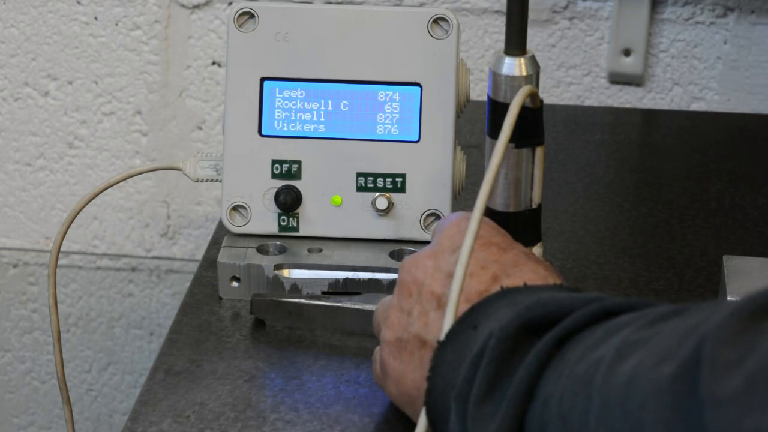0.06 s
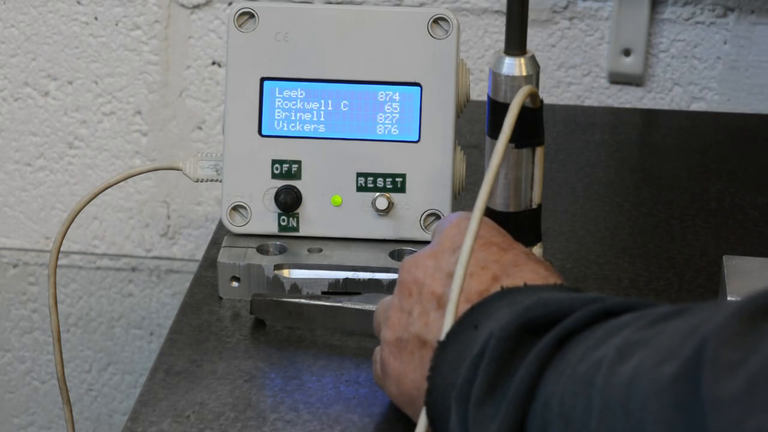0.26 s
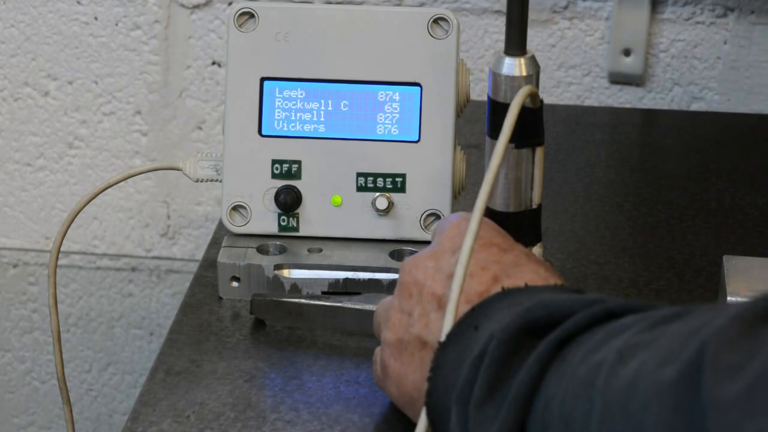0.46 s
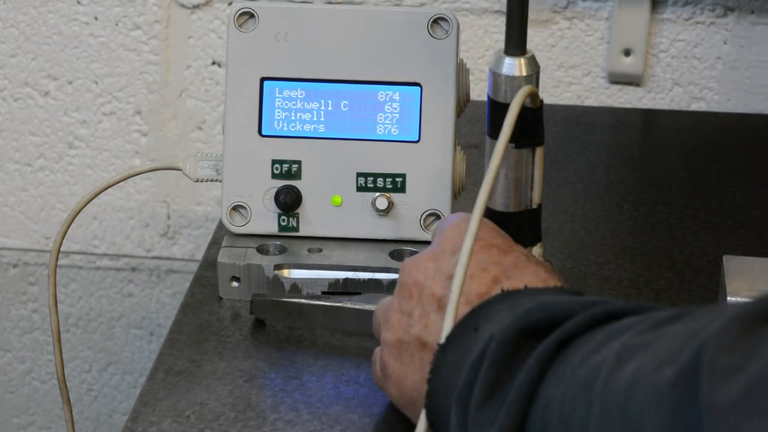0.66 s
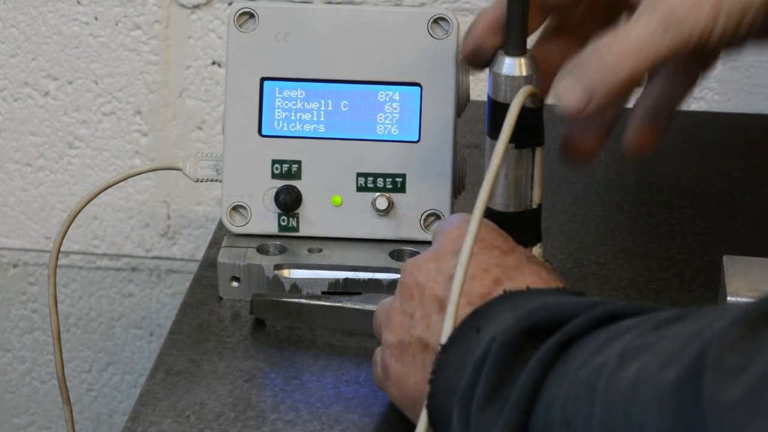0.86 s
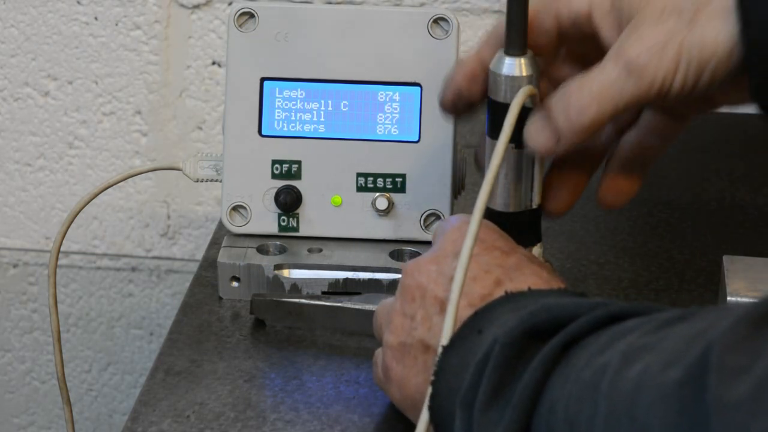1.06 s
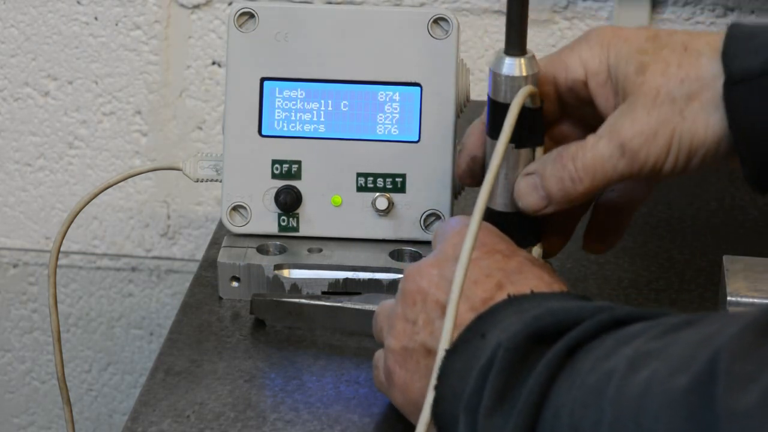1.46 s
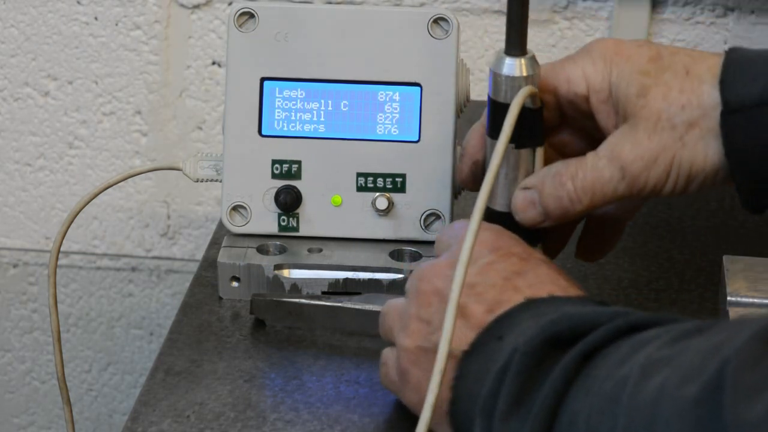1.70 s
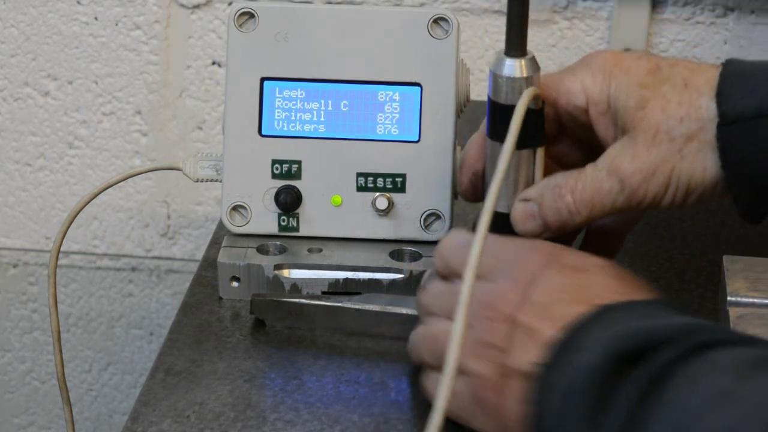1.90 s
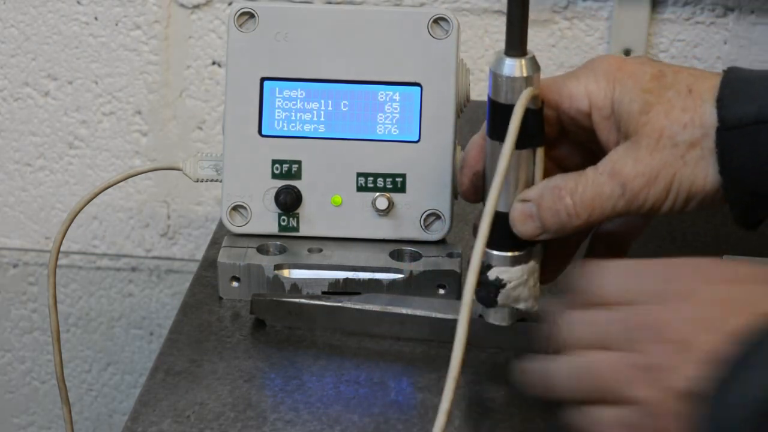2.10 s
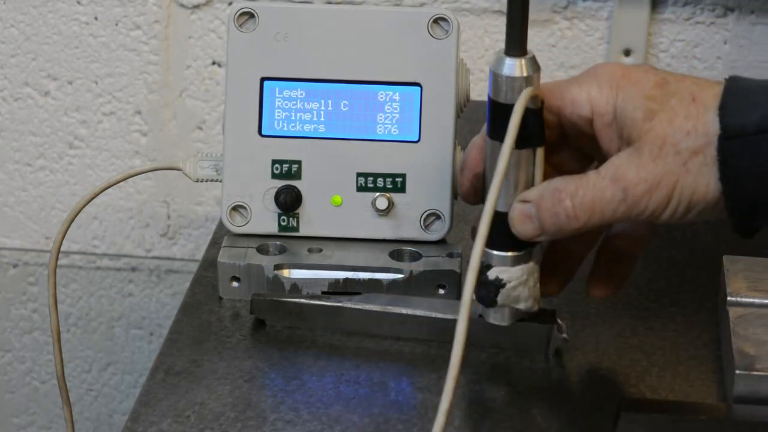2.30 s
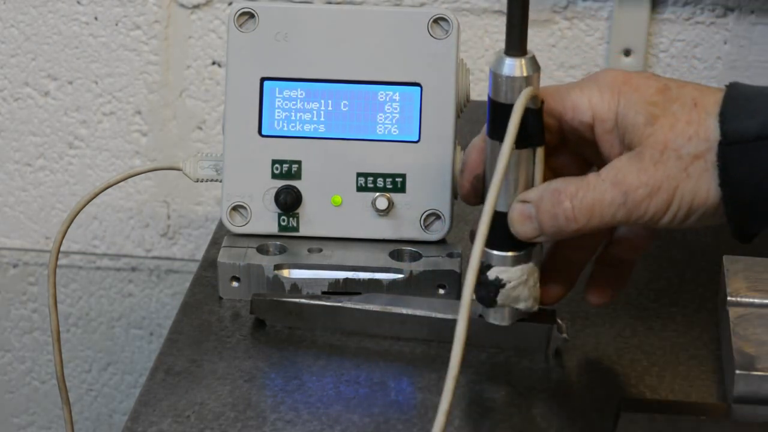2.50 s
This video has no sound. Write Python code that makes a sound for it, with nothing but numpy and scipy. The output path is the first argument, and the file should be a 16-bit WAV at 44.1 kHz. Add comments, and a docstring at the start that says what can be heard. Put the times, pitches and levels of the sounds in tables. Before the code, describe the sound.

Bright metallic clicks ring out close by as a small object bounces down to rest on steel, quickening and fading into a short rattle. Faint ticks, one soft sleeve brush and a low workshop hum lie underneath.

```python
"""Sharp ringing cracks quicken into a brief chatter: a small hard body drops down a guide tube
and bounces to rest on a steel block. Each contact sets tube, block and fittings ringing and dies
away in the workshop. Faint ticks and one sleeve brush fall around the bounces, over mains hum,
a thin steady whistle, hiss and the low rumble of hands on the bench."""
import sys
import numpy as np
from scipy import signal
from scipy.fft import rfft, irfft
from scipy.io import wavfile

SR = 44100
rng = np.random.default_rng(int(sys.argv[2]) if len(sys.argv) > 2 else 0)


def inscribe(sig):
    """Save sig as 16-bit PCM at rate SR to the path in sys.argv[1].

    A 1-D sig is mono; a 2-D sig holds one channel per row.
    Samples are clipped to [-1, 1] before scaling.
    """
    pcm = np.round(np.clip(np.atleast_2d(sig).T, -1, 1) * 32767)
    wavfile.write(sys.argv[1], SR, pcm.astype(np.int16))


N = 116865
RING = 16384   # samples per struck sound
AGE_S, TIME_S = np.arange(RING) / SR, np.arange(N) / SR
# dense ringing of the fittings: (frequency [Hz], density [dB])
FITTINGS_SPECTRUM = [(100, -54), (300, -19), (550, -15.5), (1000, -9), (1500, -6), (2000, -15.5),
                     (3000, -8.5), (3600, 3), (5000, 1.5), (6800, -3), (8400, -2), (9200, -14.5),
                     (10800, -9.5), (12500, -27), (16000, -48)]
FITTINGS_T60_S = .038


def from_db(db):
    return 10 ** (np.asarray(db) / 20)


def unit_rms(x):
    return x / np.sqrt(np.mean(x ** 2) + 1e-20)


def at_hz(points, hz):
    """Interpolate a table over log frequency."""
    points_hz, values = np.transpose(points)
    return np.interp(np.log(np.maximum(hz, 1)), np.log(points_hz), values)


def bins_hz(size):
    return np.arange(size // 2 + 1) * SR / size


def decay(t60_s):
    return from_db(-60 * AGE_S / t60_s)


def add(out, start_s, sound):
    i = int(np.clip(round(start_s * SR), 0, len(out)))
    out[i:i + len(sound)] += sound[:len(out) - i]


def shaped(white, spectrum):
    """Zero-phase equaliser for noise."""
    return irfft(rfft(white) * from_db(at_hz(spectrum, bins_hz(len(white)))), len(white))


def coloured(x, spectrum):
    """Minimum-phase equaliser: nothing sounds ahead of the attack."""
    cepstrum = irfft(np.log(from_db(at_hz(spectrum, bins_hz(RING)))))
    cepstrum[1:RING // 2] *= 2
    cepstrum[RING // 2 + 1:] = 0
    return irfft(rfft(x) * np.exp(rfft(cepstrum)))


def mode(hz, db, t60_s):
    """One struck partial: a damped sine."""
    return from_db(db) * np.sin(2 * np.pi * hz * AGE_S) * decay(t60_s)


def hiss_and_hum():
    """Steady hiss, mains hum and a thin whistle."""
    # hiss: (frequency [Hz], density [dB])
    spectrum = [(20, 7), (70, 20), (130, 14), (600, 6.5), (2400, 1), (4500, 3.5), (8000, 0), (12000, -4.5),
                (16000, -6.5)]
    # hum and whistle: (frequency [Hz], rms level [dB])
    tones = [(50, -53), (150, -62), (15734, -73)]
    hiss = from_db(-48) * shaped(rng.standard_normal(N), spectrum)
    hum = sum(from_db(db) * np.sin(2 * np.pi * (hz * TIME_S + rng.random())) for hz, db in tones)
    return hiss + np.sqrt(2) * hum


def hand_rumble():
    """Hands moving on the bench: low noise that swells, then holds."""
    # rumble: (frequency [Hz], density [dB])
    spectrum = [(20, 1), (80, -0.5), (160, -5.5), (400, -12.5), (900, -15), (3000, -22.5)]
    # swell: (time [s], rms level [dB])
    levels = [(0, -61), (.9, -53), (1.4, -48), (1.8, -45), (2.15, -45), (2.55, -45), (2.65, -45)]
    swell = from_db(np.interp(TIME_S, *np.transpose(levels)))
    return swell * unit_rms(shaped(rng.standard_normal(N), spectrum))


def ticks(half_width_oct=.04):
    """Light touches: a tiny snap and a narrow band of ringing noise."""
    # touches: (time [s], gain [dB], ring centre [Hz], ring t60 [s], relative snap [dB])
    touches = [(.083, -33.5, 4280, 0.037, -15), (0.371, -38, 3760, 0.17, -1.5), (0.741, -47, 5530, .06, -1),
               (1.136, -43, 6660, .06, 1), (1.177, -39, 5040, 0.089, -1)]
    out = np.zeros(N)
    for start_s, db, hz, t60_s, snap_db in touches:
        white = rng.standard_normal(RING)
        offset_oct = np.log2((bins_hz(RING) + 1) / hz)
        band = irfft(rfft(white) / (1 + (offset_oct / half_width_oct) ** 2))
        ring = .5 * unit_rms(band) * decay(t60_s)
        snap = from_db(snap_db) * unit_rms(shaped(white, FITTINGS_SPECTRUM)) * decay(FITTINGS_T60_S)
        add(out, start_s, from_db(db) * (ring + snap))
    return out


def contacts(chatter_s=2.399, gap_s=.0125, gap_ratio=.75, chatter_db=-22.5, loss_db=2.4):
    """Separate bounces, then six ever shorter, weaker hops in the colour of the last bounce."""
    # bounces: (time [s], strength [dB], crack gain [dB], gain in each of four colour bands [dB])
    bounces = [(0.2103, 0.66, 0.5, 1, -2.5, 3, -2.5), (0.5293, -0.3, 1.5, 2.2, -3, 2, -3.5),
               (0.8035, -0.56, -1.5, 1, -1.5, 0.5, -2), (1.0177, .3, 1, 0.5, -1, -2.2, -2.5),
               (1.1966, -1, 1, 2, -2.5, -1.2, -3), (1.354, -1.7, 0, 2.5, -2, -3.2, -0.3),
               (1.5026, -1.6, 2.5, 0.9, 0.5, -0.5, -4), (1.6434, -3, 3.5, 2, 0.5, -4, 1),
               (1.777, -3.5, 1, 2.3, 3, 0.5, -7.5), (1.8985, -4, 2.5, -0.5, 1.5, 1, -3),
               (2.0021, -5, -0.5, 0.2, 1, -3, 1.2), (2.093, -6, 0, .5, 0, -1.5, 0.5),
               (2.1738, -7.5, 2, 0.5, 2, -5, 0.5), (2.2344, -8.5, 2.5, 0, 0.5, -2.5, 1),
               (2.2841, -12, 2.5, 0, 2, -4, 1), (2.3268, -13.5, 0, -0.5, 4.5, -2.3, 2),
               (2.3582, -17, 2, -1, 3, -2, 1), (2.3821, -18.7, 1.5, -1, 6, -1.5, 4)]
    hops, start_s = [], chatter_s
    for k in range(6):
        hops.append((start_s, chatter_db - loss_db * k, *bounces[-1][2:]))
        start_s += gap_s * gap_ratio ** k
    return [*bounces, *hops]


def crack(hz=6230, bench_s=.001012, wall_s=.0039, scatter_s=.0011, wall_echoes=4):
    """A few cycles of hard contact, an echo off the bench and a cluster off the rough wall."""
    # contact tone: (frequency [Hz], gain [dB])
    tone = [(2700, -10), (3600, 0), (9000, 0), (11000, -4), (12500, -13), (16000, -23)]
    pulse = coloured(np.sin(2 * np.pi * hz * AGE_S) * AGE_S * decay(t60_s=.00075), tone)
    pulse = from_db(-5.5) * pulse / np.abs(pulse).max()
    out = pulse.copy()
    add(out, bench_s, from_db(-2.5) * pulse)
    for k in range(wall_echoes):
        add(out, wall_s + scatter_s * (k + rng.random()) / wall_echoes, from_db(-7.5) * pulse)
    return out


def steel_ring(start_s, strength_db, grip_s=1.45, treble_hz=8250):
    """Tube and block ring; a few modes are muffled once a second hand grips the tube."""
    # tube and block modes: (frequency [Hz], base level [dB], base t60 [s])
    modes = [(845, -46, .33), (917, -36, .18), (952, -38, .13), (1230, -37, .25), (1418, -33, .15),
             (1547, -32, .1), (1590, -34, .09), (2125, -38, .08), (2487, -40, .13), (2575, -38, .27),
             (2780, -39, .16), (2812, -39.5, .24), (3135, -38, .23), (3353, -17, .092), (3430, -34.5, .26),
             (3744, -36, .15), (4391, -31, .16), (4634, -33, .25), (4688, -33, .28), (4732, -28.5, .24),
             (4772, -34, .25), (5002, -35, .27), (5489, -26.5, .26), (5548, -36, .24), (5701, -30.5, .27),
             (5811, -31, .28), (6026, -35, .18), (6400, -35, .18), (6800, -36, .34), (6893, -33, .15),
             (6965, -36, .17), (7175, -37, .19), (8688, -30, .06), (9530, -37, .08), (10620, -39, .06),
             (10850, -37, .07), (11080, -42, .05)]
    # damping by the hand: (mode frequency [Hz], loss [dB])
    grip_loss = [(1230, 5), (1418, 10), (2125, 4), (2575, 5), (6800, 5)]
    loss_db = dict(grip_loss) if start_s > grip_s else {}
    out = np.zeros(RING)
    for k, (hz, db, t60_s) in enumerate(modes):
        spread_db = 3.5 if hz > treble_hz else .93   # top modes depend most on where the body lands
        level_db = db + .37 + spread_db * rng.standard_normal() - loss_db.get(hz, 0)
        out += (-1) ** k * mode(hz, level_db, .99 * t60_s)
    return from_db(strength_db) * out


def fittings_clank(white):
    """Dense, short ringing of the fittings as decaying noise."""
    return from_db(-6.5) * shaped(white, FITTINGS_SPECTRUM) * decay(FITTINGS_T60_S)


def room_tail(white, build_s=.0036):
    """Diffuse workshop sound: builds quickly, dies sooner in the high bands."""
    # room response: (frequency [Hz], density [dB])
    response = [(200, -15.5), (600, -16), (950, -8.5), (1500, -11.5), (1900, -14.5), (2600, -10),
                (2950, -17), (3400, -1.5), (3900, -4.5), (4700, 4), (5200, 2.5), (5700, 4.5), (7000, -1),
                (8400, -4.5), (9200, -12.5), (10800, -12.5), (12500, -22), (16000, -41)]
    # room decay: (frequency [Hz], t60 [s])
    t60s = [(500, 0.3), (2000, 0.28), (5000, 0.21), (8000, 0.19), (12000, 0.16)]
    spectrum, hz = rfft(shaped(white, response)), bins_hz(RING)
    edges_hz = np.r_[0, np.geomspace(1000, 13000, 8), SR]
    tail = np.zeros(RING)
    for lo, hi in zip(edges_hz, edges_hz[1:]):
        band = irfft(spectrum * ((hz >= lo) & (hz < hi)))
        tail += band * decay(at_hz(t60s, (lo + hi) / 2))
    return from_db(-15) * tail * (1 - np.exp(-AGE_S / build_s))


def bench_knock(strength_db):
    """Dull knock of block on bench; follows 3/4 of the contact strength in dB."""
    # knock modes: (frequency [Hz], base level [dB], t60 [s])
    modes = [(312.5, -40, 0.066), (405, -50.5, 0.034), (671, -39.5, 0.06)]
    return from_db(.75 * strength_db) * sum(mode(*row) for row in modes)


def bouncing(fresh_share=.22, body_hz=1620, body_share=.19, treble_hz=8250):
    """Each contact excites steel, fittings and room; fine detail drifts as the hands move."""
    # colour bands: (frequency [Hz])
    colour_hz = [3620, 4020, 4780, 6100]
    out = np.zeros(N)
    noise = rng.standard_normal((2, RING))
    for start_s, strength_db, crack_db, *colour_db in contacts():
        fresh = rng.standard_normal((2, RING))
        noise = np.sqrt(1 - fresh_share) * noise + np.sqrt(fresh_share) * fresh
        ring = steel_ring(start_s, strength_db)
        burst = from_db(crack_db) * crack() + fittings_clank(noise[0]) + room_tail(noise[1])
        hit = ring + from_db(strength_db) * burst
        lows_db = -body_share * strength_db   # soft contacts lose less in the lows
        tone = [(body_hz, lows_db), *zip(colour_hz, colour_db), (treble_hz, 0)]
        add(out, start_s, coloured(hit, tone) + bench_knock(strength_db))
    return out


def sleeve(peak_s=.695, sigma_s=.033, peak_db=-44):
    """Cloth brushes once as the arm moves."""
    # cloth friction: (frequency [Hz], density [dB])
    spectrum = [(300, -6), (1500, -4), (2700, -8), (4300, 2), (5500, -5), (7000, -14), (14000, -32)]
    swell = np.exp(-.5 * ((TIME_S - peak_s) / sigma_s) ** 2)
    return from_db(peak_db) * swell * unit_rms(shaped(rng.standard_normal(N), spectrum))


def off_centre_ring():
    """Off-centre contacts ring on with extra partials."""
    # partials: (time [s], frequency [Hz], level [dB], t60 [s])
    partials = [(1.502, 5329, -28, 0.14), (1.503, 5518, -28, 0.13), (1.645, 5800, -33, 0.12),
                (1.777, 4068, -28.5, 0.25), (1.777, 4220, -34, .2), (1.778, 4200, -34, 0.42),
                (1.778, 4280, -25.5, 0.12), (1.8993, 4780, -38, 0.18), (1.8985, 4940, -26, 0.2)]
    out = np.zeros(N)
    for start_s, hz, db, t60_s in partials:
        add(out, start_s, mode(hz, db, t60_s))
    return out


def scene():
    """All sources, close and in mono."""
    return (hiss_and_hum() + hand_rumble() + sleeve() + bouncing() + off_centre_ring() + ticks())[None]


def record(dry):
    """Steep low-pass at 16 kHz."""
    return signal.sosfilt(signal.ellip(10, .1, 80, 16000, fs=SR, output="sos"), dry)


dry = scene()
out = record(dry)
inscribe(out)
```